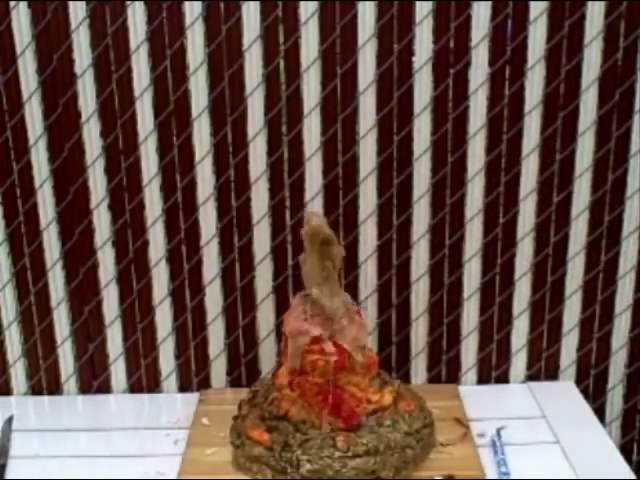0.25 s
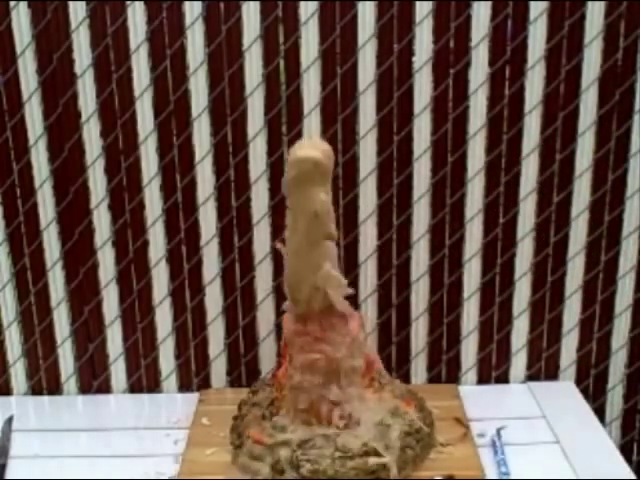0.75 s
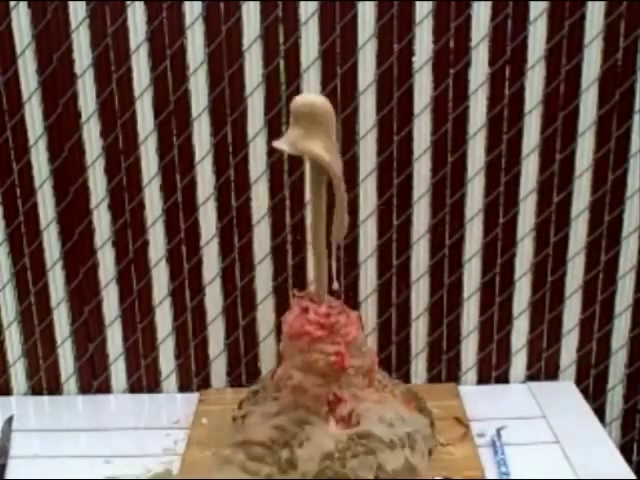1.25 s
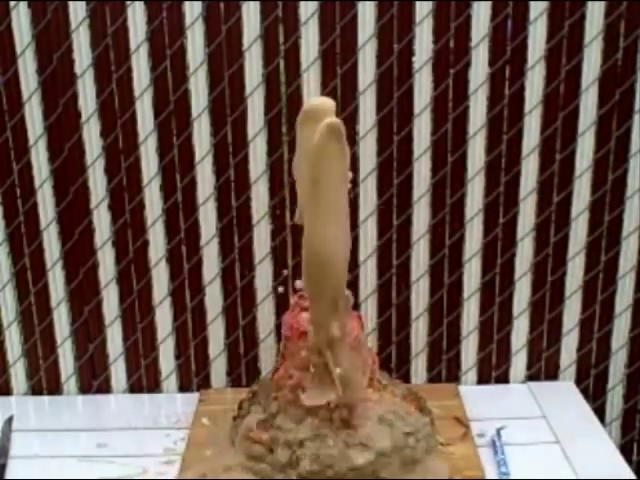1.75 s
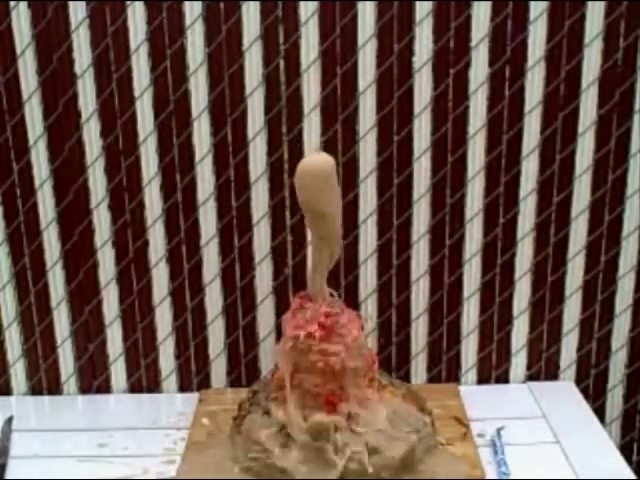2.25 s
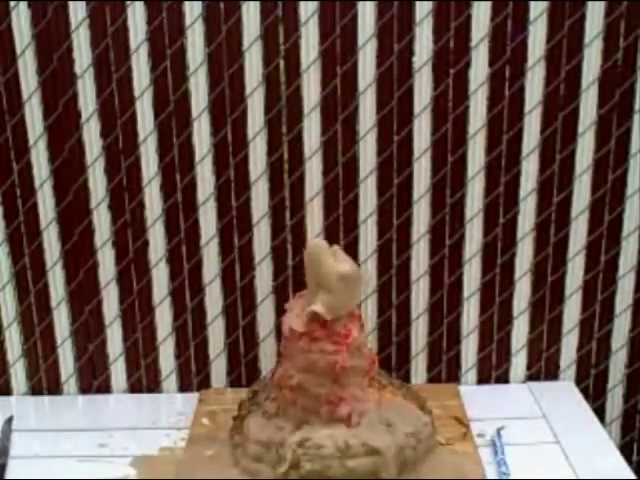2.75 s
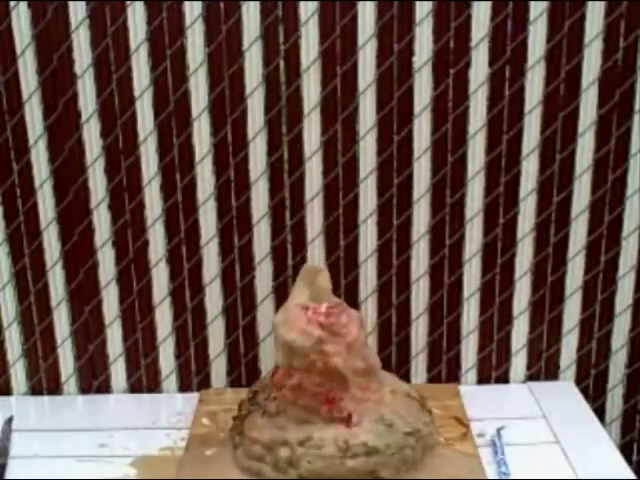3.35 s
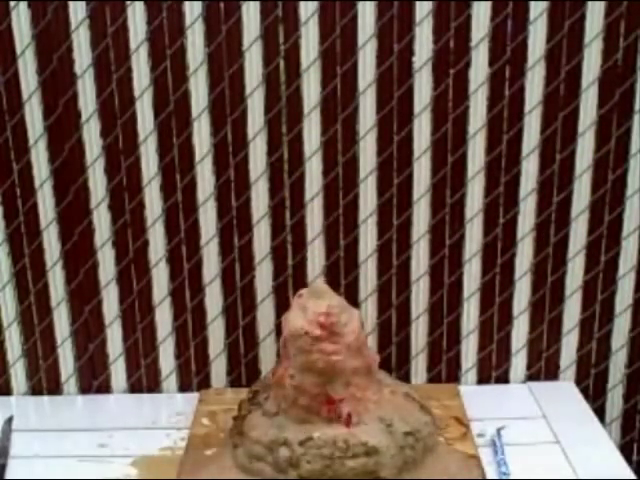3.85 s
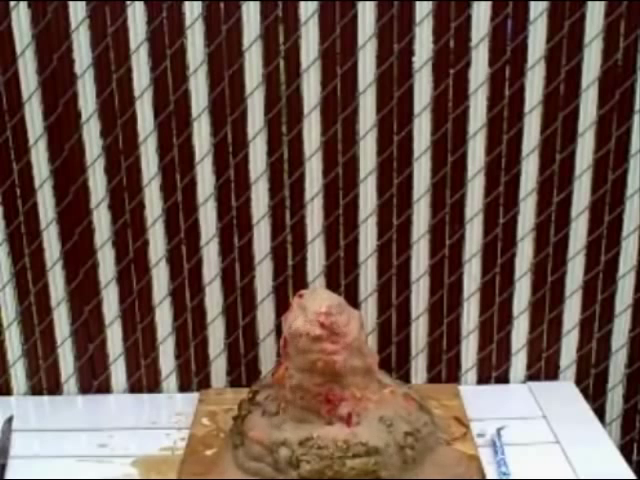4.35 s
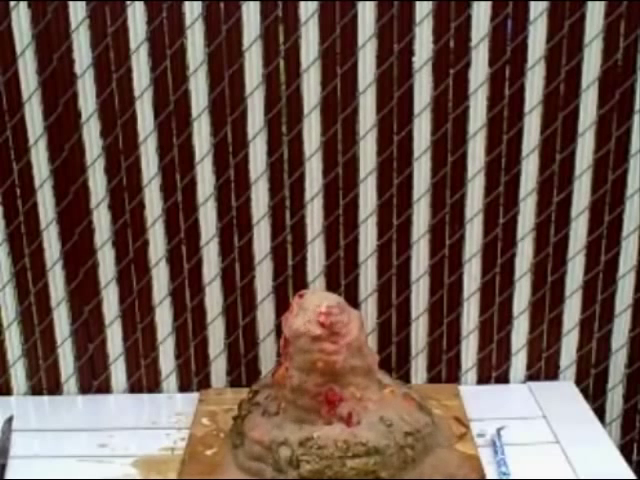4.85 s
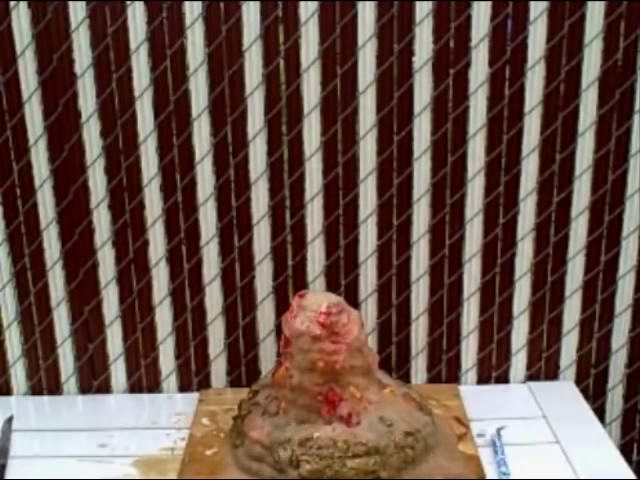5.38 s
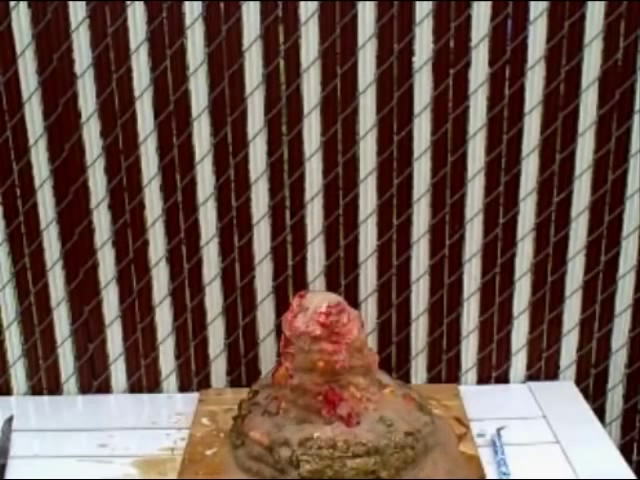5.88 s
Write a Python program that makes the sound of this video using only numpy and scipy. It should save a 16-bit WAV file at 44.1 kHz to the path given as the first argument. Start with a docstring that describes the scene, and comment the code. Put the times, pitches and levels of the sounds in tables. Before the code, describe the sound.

A low outdoor rumble runs throughout, with almost no echo. At about 0.2 seconds soda foam spurts from a bottle neck with a brief, soft, bright hiss, and a fine fizz begins to build. From 0.5 seconds the first small blobs and drips land with light wet ticks. Between 1.1 and 1.5 seconds heavy lumps of foam slap onto a hollow model volcano in a rapid cluster of sharp splats and high smacks, loudest near 1.35 seconds. Smaller gurgling splashes and plipping drips follow thickly until about 2.5 seconds, over a continuous bubbly patter. The jet hisses softly again around 2.8 to 3.3 seconds. The foam then keeps fizzing, crackling and pattering steadily to the end at about 6 seconds, with distinct drips and little splats near 3.4, 3.6, 5.1 and 6 seconds.

```python
"""Soda foam gushes from a bottle in a model volcano, outdoors on a board before a fence.
The jet hisses in the neck, fizz builds and the first small blobs land. After a second heavy lumps
slap down on the hollow cone and trapped air smacks out. Then foam keeps pattering, dripping and
fizzing; the jet surges again near 3 s. A low outdoor rumble lies underneath throughout."""
import sys
import numpy as np
from scipy import signal
from scipy.fft import rfft, irfft, next_fast_len
from scipy.io import wavfile

SR = 44100
rng = np.random.default_rng(int(sys.argv[2]) if len(sys.argv) > 2 else 0)


def unload_wav(signal):
    """Save mono or channel-first audio to the path in sys.argv[1] as 16-bit WAV at rate SR, clipped to [-1, 1]."""
    wavfile.write(
        sys.argv[1],
        SR,
        np.round(np.clip(np.atleast_2d(signal).T, -1, 1) * 32767).astype(np.int16),
    )


N = 269662
T = np.arange(N) / SR

# foam raining on the cone: t/s, level/dB
FOAM_FLOW = [(0, -79), (.25, -59), (.58, -51.5), (.7, -54), (.81, -46), (.9, -55), (1.0, -51), (1.12, -38),
             (1.23, -43.5), (1.33, -34), (1.52, -43.5), (1.68, -38), (1.8, -46), (1.9, -40.5), (2.08, -43),
             (2.32, -40.5), (2.48, -41.5), (3.25, -43), (4.1, -43.5), (4.5, -44), (5.1, -42.5), (6.11, -43)]
# tone of the small wet impacts as heard: f/Hz, gain/dB
DROP_TONE = [(100, -17), (250, -1.5), (380, -3), (600, -2), (1100, -3), (2200, 0.5), (3600, -2.5),
             (3850, -3), (4050, 0.5), (4280, -4), (4500, 1), (5100, -0.5), (5900, -11.5), (6400, -6),
             (7200, -30), (10500, -19)]


def slaps(rise_s=0.0039, thud_decay_s=0.022, thud_hz=324, thud_width_hz=1200):
    """Heavy lumps crack, break into gurgling droplets with a hollow pitch and thud on the cone."""
    # lumps: t/s, level/dB, decay/s, crack/dB, ring re level/dB, hollow pitch/Hz
    lumps = [(1.141, -22, 0.015, -3, -2, 1500), (1.1564, -17.5, 0.0075, 3, -1, 1900),
             (1.168, -16.5, 0.018, -10, -6, 1750), (1.250, -30, 0.0072, -25, 5, 2000),
             (1.259, -16, 0.012, 0, -8, 2950), (1.268, -17.5, .004, -6, -8, 2700),
             (1.291, -27, 0.0041, -14, 0, 2200), (1.335, -8, 0.0063, 7.5, -3.5, 3240),
             (1.346, -16, 0.014, 4, -5, 1300), (1.359, -20, 0.0066, 0, -6, 1300),
             (1.380, -15, 0.0023, -2, -4, 2000), (1.395, -19.5, 0.018, -3, -4, 1000),
             (1.452, -26.5, 0.011, -18, -5, 2200)]
    # tone of the heavy slaps as heard, treble cut out from about 6.5 to 9.5 kHz: f/Hz, gain/dB
    slap_tone = [(60, -9), (140, -10), (400, -6), (1000, -2), (2000, 1), (3300, -2), (3650, -1),
                 (3860, -11), (4030, 4), (4600, 1), (6000, -14), (6700, -38), (9300, -37), (10200, -1.5)]
    # hollow modes of cone and board: f/Hz, width/Hz, gain/dB
    cone_modes = [(617, 8.2, 6), (1570, 61, -12), (2080, 17, -9), (2400, 22, -7), (2480, 14, 0),
                  (2750, 50, -3), (2980, 100, -10), (3292, 19, 10), (4450, 70, 3)]
    droplets = impacts(rate_hz=3000, spread_db=1.2)
    splash, cracks, weight = 0, np.zeros(N), 0
    # fine spray ahead of the first lump wakes only the ring
    bright = undb(-28.5) * burst(start_s=1.065, rise_s=0.13, decay_s=0.012)
    for t, db, decay_s, crack_db, ring_db, hz in lumps:
        force = undb(db) * burst(t, rise_s, decay_s)
        spray = force * droplets
        splash = splash + spray + resonate(spray, hz, width_hz=900)
        bright = bright + undb(ring_db) * force
        weight = weight + undb(db) * burst(t, rise_s, thud_decay_s)
        cracks[int((t + rise_s) * SR)] = undb(crack_db)
    splash = undb(0.5) * gurgle(splash, depth_db=-4, rate_hz=60) + cracks
    slap = body(splash, slap_tone, cone_modes)
    thud = resonate_twice(weight * rng.standard_normal(N), thud_hz, thud_width_hz)
    return undb(-2.5) * slap + undb(-6.5) * thud + undb(2.5) * ring(bright * droplets, heavy=True)


def smacks():
    """Air squeezed under falling foam rings up and dies within milliseconds."""
    # air pockets: t/s, peak/dB, f/Hz, swell/s
    pockets = [(0.950, -28, 5780, 0.003), (1.135, -15, 5600, .0015), (1.157, -5.5, 5530, 0.0021),
               (1.1692, -12, 6040, 0.0025), (1.175, -13, 6230, .004), (1.2635, -14.5, 4700, .0018),
               (1.269, -13, 5540, .0018), (1.3367, -8.5, 5070, 0.0024), (1.342, -7, 5730, 0.0021),
               (1.344, -10, 5840, 0.0027), (1.3475, -9, 4930, 0.0024), (1.3503, -13, 5730, 0.0024),
               (1.355, -8, 5150, 0.0017), (1.38, -10, 5800, 0.0022), (1.4013, -11, 5470, .0015),
               (1.4035, -17, 5370, .002), (1.8288, -26, 5760, .0015), (1.8808, -25, 5750, 0.0014),
               (2.0365, -23, 5770, .0015), (3.593, -24, 5750, .0015), (4.3312, -19.5, 5850, 0.0014),
               (4.9488, -24, 5900, .0014), (5.104, -22, 5800, .0011), (5.1163, -16, 5400, 0.00089),
               (5.280, -19.5, 5850, .0015), (5.9955, -19, 5800, .0014), (5.9985, -24, 5820, 0.0016),
               (6.002, -23, 5900, .0012)]
    out, age = np.zeros(N), T[:SR // 32]
    for t, db, hz, swell_s in pockets:
        envelope = (age / swell_s * np.exp(1 - age / swell_s)) ** 3
        start = int(t * SR)
        out[start:start + len(age)] += undb(db) * envelope * np.sin(2 * np.pi * hz * age)
    return out


def blobs():
    """Small blobs land with a gurgling splat and a bright ring, then trail off in spatter."""
    # landings: t/s, body/dB, ring/dB, decay/s
    landings = [(0.518, -48.5, -42.5, 0.0078), (0.756, -49, -34, 0.0048), (0.79, -44, -37, 0.003),
                (0.837, -37, -39, 0.0034), (1.021, -38, -42, 0.014), (1.545, -39.5, -31, 0.0096),
                (1.617, -35, -30, 0.031), (1.643, -40, -40, 0.0045), (1.764, -30, -27.5, 0.0029),
                (1.828, -49, -29, 0.0032), (1.875, -32, -29.5, 0.013), (1.921, -31, -35, 0.0078),
                (1.961, -35, -28.5, 0.0047), (2.037, -34, -36, 0.0045), (2.156, -34.5, -28, 0.016),
                (2.265, -38, -33, 0.033), (2.31, -29.5, -31, 0.014), (2.345, -34, -27, 0.0047),
                (2.540, -39, -37, 0.0077), (2.754, -34, -32, .012), (3.105, -35.5, -34, 0.017),
                (3.123, -40.5, -31.5, 0.022), (3.299, -41, -39, 0.0067), (3.4, -32.5, -49, 0.0039),
                (3.411, -40, -49, 0.004), (3.594, -31, -23.5, 0.004), (4.330, -54, -36, 0.0069),
                (4.949, -46, -29, 0.0023), (4.996, -42.5, -27.5, 0.0052), (5.082, -39, -24, 0.0043),
                (5.281, -43, -36, 0.0064), (5.45, -40.5, -30.5, 0.013), (5.997, -36, -29, 0.01)]
    spray = impacts(rate_hz=4000, spread_db=1.2)
    dull, bright = 0, 0
    for t, body_db, ring_db, decay_s in landings:
        spatter = undb(-9) * burst(t, rise_s=0.0086, decay_s=0.039)
        splat = burst(t, 0.49 * decay_s, decay_s) + spatter
        dull = dull + undb(body_db) * splat
        bright = bright + undb(ring_db) * splat
    splash = gurgle(undb(1) * dull * spray, depth_db=6, rate_hz=40)
    return body(splash, DROP_TONE) + undb(-2) * ring(bright * spray, heavy=False)


def drips():
    """Fat drips hit with a dry crack and trap a bubble that rings one short plip."""
    # hits: t/s, crack/dB, plip/dB, f/Hz
    hits = [(0.5276, -23, -40, 2600), (0.7556, -15, -36, 2400), (0.8023, -11, -40, 3200),
            (0.8439, -6.5, -42, 3000), (1.0435, -13, -40, 2400), (1.5205, -18, -29, 2600),
            (1.6229, -10, -23.5, 2980), (1.768, -16, -36, 1800), (1.8443, -11, -25, 2470),
            (2.1644, -21, -29, 1930), (2.3207, -24, -37, 2330), (2.4687, -9, -30, 2600),
            (2.5429, -16, -29, 1510), (2.5551, -14, -26, 2700), (2.9075, -21, -26.5, 2020),
            (3.4005, -25, -32, 960), (3.419, -5, -24, 2230), (3.5933, -10, -32, 1260),
            (4.0509, -13, -34, 2600), (4.091, -26, -28, 2580), (5.0986, -8, -35, 2200),
            (5.9993, -6.5, -32, 2280)]
    # tone of the cracks: f/Hz, gain/dB
    crack_tone = [(150, -9), (600, -6), (2000, -4), (3900, -2), (4400, -5), (7000, -3), (10500, -21)]
    cracks, plips = np.zeros(N), np.zeros(N)
    for t, crack_db, plip_db, hz in hits:
        plip = bubble(hz, life_s=0.00061, glide=0.23)
        start = int(t * SR)
        cracks[start] = undb(crack_db)
        plips[start:start + len(plip)] += undb(plip_db) * plip
    return body(cracks, crack_tone) + plips


def patter():
    """Foam rains down in gurgling clumps; sparser hard drops set off the ring."""
    flow_db, = curves(FOAM_FLOW)
    flow = undb(flow_db) * flutter(depth_db=3, rate_hz=80)
    soft = impacts(rate_hz=2800, spread_db=1.3)
    hard = impacts(rate_hz=1600, spread_db=1) * flutter(depth_db=6, rate_hz=110)
    splash = body(gurgle(flow * soft, depth_db=5.5, rate_hz=45), DROP_TONE)
    ticks = ring(flow * (hard + undb(-22) * soft), heavy=False)
    return undb(4) * splash + undb(1) * ticks


def fizz(low_hz=6600, high_hz=9600, q=5, build_s=0.73, sag_db_per_s=0.67):
    """Gas bursts tiny bubbles in flurries, the smallest weakest; it builds, then slowly runs out."""
    pops = 0
    for hz, db in zip(np.geomspace(low_hz, high_hz, 5), np.linspace(0, -8, 5)):
        pops = pops + undb(db) * resonate_twice(impacts(rate_hz=2400, spread_db=5), hz, hz / q)
    flurries = unit(pops * flutter(depth_db=7.5, rate_hz=60))
    ringing = undb(-2) * ring(impacts(rate_hz=1500, spread_db=7.5), heavy=False)
    gas_db = -36 - 27 * np.exp(-T / build_s) - sag_db_per_s * T
    return (flurries + ringing) * undb(gas_db)


def bubbles(count=1500, low_hz=450, high_hz=3700, mean_life_s=0.003):
    """Bubbles ring briefly in the wet foam; small ones are more common."""
    flow_db, = curves(FOAM_FLOW)
    out = np.zeros(N + SR)
    for when, smallness, strength, longevity in rng.random((count, 4)):
        hz = low_hz + (high_hz - low_hz) * np.sqrt(smallness)
        tone = bubble(hz, mean_life_s * (0.5 + longevity), glide=0.03)
        db = 0.1 * np.log(max(1 - strength, 0.03))
        start = int(when * N)
        out[start:start + len(tone)] += undb(db) * tone
    return unit(out[:N]) * undb(flow_db - 3.5)


def crackle():
    """Larger foam films snap with lone dry clicks."""
    flow_db, = curves(FOAM_FLOW)
    snaps = impacts(rate_hz=70, spread_db=2.8)
    return unit(resonate(snaps, hz=2500, width_hz=3200)) * undb(flow_db - 8.5)


def jet(rise_s=0.012):
    """The jet surges in the bottle neck with a bright hiss."""
    # surges: t/s, level/dB, decay/s
    surges = [(0.16, -45.5, 0.072), (0.26, -68, .12), (2.78, -48, .15), (3.02, -47, 0.26), (3.48, -60, .25)]
    push = sum(undb(db) * burst(t, rise_s, decay_s) for t, db, decay_s in surges)
    return ring(push * rng.standard_normal(N), heavy=False)


def outdoors():
    """A deep throb and a low drone swell and sink under near-steady air noise."""
    # rumble: t/s, throb/dB, drone/dB
    rumble = [(0.0, -47.5, -36), (0.18, -36.5, -40), (0.44, -42, -47), (0.6, -40, -39), (1.2, -63, -43),
              (1.35, -58, -43.5), (2.39, -55, -35.5), (2.44, -55, -43), (3.47, -54.5, -44),
              (3.59, -44, -40), (3.71, -50, -41), (3.86, -47, -40), (4.23, -48, -38.5), (4.63, -48, -42.5),
              (4.78, -51, -46.5), (5.86, -57.5, -42.5), (6.05, -68, -47)]
    # outdoor air spectrum: f/Hz, gain/dB
    air_spectrum = [(20, -12.5), (60, 1.5), (100, -5.5), (190, -11), (300, -18), (420, -18.5), (750, -19),
                    (1200, -26), (3500, -31), (10000, -58)]
    throb_db, drone_db = curves(rumble)
    throb = unit(resonate_twice(rng.standard_normal(N), hz=26, width_hz=7))
    drone = unit(resonate_twice(rng.standard_normal(N), hz=46, width_hz=17))
    air = unit(colour(rng.standard_normal(N), air_spectrum)) * undb(-42.5 + walk(rate_hz=3.22))
    return throb * undb(throb_db + 7) + drone * undb(drone_db + 3) + air


def yard(x, tail_db=-18, t60_s=0.1):
    """Fence and yard add a faint, short, scattered tail."""
    age = T[:SR // 2]
    tail = rng.standard_normal(len(age)) * undb(-60 * age / t60_s)
    return x + undb(tail_db) * signal.fftconvolve(x, tail / np.linalg.norm(tail))[:N]


def ring(x, heavy, edge_hz=6100):
    """Shared bright ring, cut off sharply above; heavy blows favour its lower modes."""
    # modes: f/Hz, width/Hz, heavy gain/dB, light gain/dB
    modes = [(4630, 580, -2, -9.5), (5060, 54, 8.5, -18), (5266, 116, 4, 2.5), (5680, 300, 7.5, 5),
             (5840, 120, 8.5, 13.5), (5970, 500, -24, 5.5)]
    lowpass = signal.cheby1(8, 0.5, edge_hz, fs=SR, output="sos")

    def respond(drive):
        ringing = sum((-1) ** k * undb(heavy_db if heavy else light_db) * resonate(drive, hz, width_hz)
                      for k, (hz, width_hz, heavy_db, light_db) in enumerate(modes))
        return signal.sosfilt(lowpass, ringing)
    return respond(x) / np.linalg.norm(respond(signal.unit_impulse(4096)))


def body(x, tone, modes=()):
    """Broad splash plus any hollow modes it wakes; unit power gain for white noise."""
    def respond(drive):
        wet = colour(drive, tone)
        return wet + sum(undb(db) * resonate(wet, hz, width_hz) for hz, width_hz, db in modes)
    return respond(x) / np.linalg.norm(respond(signal.unit_impulse(4096)))


def gurgle(x, depth_db, rate_hz, top_hz=4900, bands=14):
    """Wet hollows open and close, so each band of a splash swells and sinks on its own."""
    size = next_fast_len(N, real=True)
    spectrum = rfft(x, size)
    position = np.minimum(np.linspace(0, SR / 2, len(spectrum)) / top_hz, 1) * (bands - 1)
    out = 0
    for k in range(bands):
        band = irfft(spectrum * np.maximum(1 - abs(position - k), 0), size)[:N]
        out = out + band * flutter(depth_db, rate_hz)
    return unit(out) * np.std(x)


def bubble(hz, life_s, glide):
    """One bubble swells and rings out, rising in pitch as it nears the surface."""
    age = T[:SR // 16]
    phase = 2 * np.pi * hz * age * (1 + glide * np.tanh(age / life_s / 10))
    return age / life_s * np.exp(1 - age / life_s) * np.sin(phase)


def impacts(rate_hz, spread_db):
    """Random tiny impacts, many weak and a few strong; rms 1."""
    strength = undb(spread_db * np.minimum(rng.exponential(size=N), 4))
    return unit((rng.random(N) < rate_hz / SR) * strength * rng.choice([-1, 1], N))


def burst(start_s, rise_s, decay_s):
    """Envelope: linear rise, exponential decay."""
    out = np.zeros(N)
    span = slice(int(start_s * SR), int((start_s + rise_s + 10 * decay_s) * SR))
    age = T[span] - start_s
    out[span] = np.clip(age / rise_s, 0, 1) * np.exp(-np.maximum(age - rise_s, 0) / decay_s)
    return out


def colour(x, points, size=4096):
    """Minimum-phase filter through (f/Hz, gain/dB) points."""
    hz, db = np.transpose(points)
    grid_hz = np.maximum(np.arange(size // 2 + 1) * SR / size, 1)
    cepstrum = irfft(np.log(undb(np.interp(np.log(grid_hz), np.log(hz), db))))
    cepstrum[1:size // 2] *= 2
    cepstrum[size // 2 + 1:] = 0
    return signal.fftconvolve(x, irfft(np.exp(rfft(cepstrum))))[:N]


def resonate(x, hz, width_hz):
    """One resonance, gain 1 at its centre."""
    return signal.lfilter(*signal.iirpeak(hz, hz / width_hz, fs=SR), x)


def resonate_twice(x, hz, width_hz):
    """Two equal resonances in series."""
    return resonate(resonate(x, hz, width_hz), hz, width_hz)


def walk(rate_hz):
    """Random wander, spread near 1."""
    knots = rng.standard_normal(N // 50)
    return 1.2 * np.interp(T * rate_hz, np.arange(len(knots)), knots)


def flutter(depth_db, rate_hz):
    """Random gain within +/- depth_db."""
    return undb(depth_db * np.tanh(walk(rate_hz)))


def curves(rows):
    """Columns of a (t/s, ...) table at every sample."""
    times, *columns = np.transpose(rows)
    return [np.interp(T, times, column) for column in columns]


def undb(db):
    """Decibels to gain."""
    return 10 ** (np.asarray(db) / 20)


def unit(x):
    """Scale to rms 1."""
    return x / np.sqrt(np.mean(x ** 2))


def scene():
    """Foam in the yard, over the rumble; mono."""
    foam = jet() + slaps() + smacks() + blobs() + drips() + patter() + bubbles() + crackle() + fizz()
    return (yard(foam) + outdoors())[None]


def record(dry):
    """Uneven treble with a gap near 8 kHz, nothing above 11 kHz."""
    # treble as heard: f/Hz, gain/dB
    treble_colour = [(7250, -4), (7480, -42), (8550, -39), (8750, -8), (9750, -14.5), (10200, -10.5),
                     (10800, -31.5)]
    coloured = np.array([colour(channel, treble_colour) for channel in dry])
    return signal.sosfilt(signal.ellip(8, 0.2, 70, 11000, fs=SR, output="sos"), coloured)


dry = scene()
out = record(dry)
unload_wav(out)
```